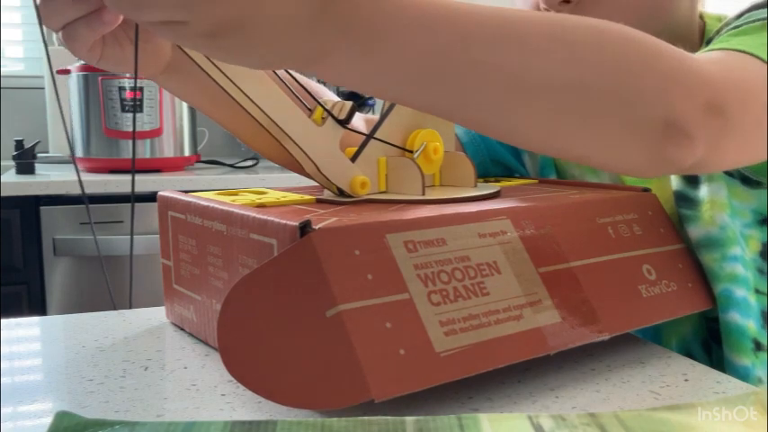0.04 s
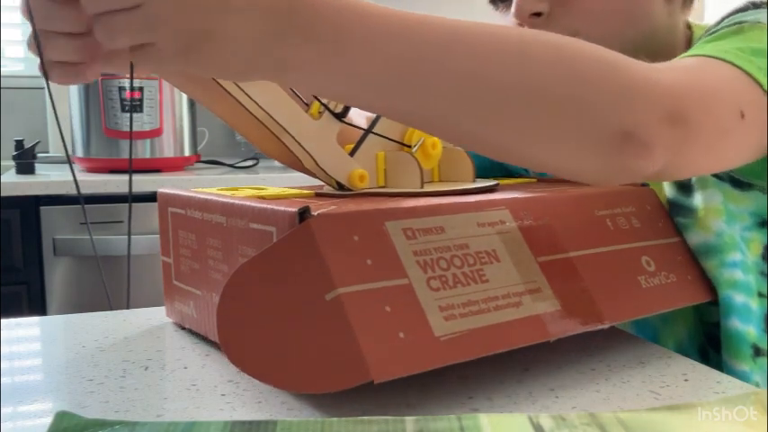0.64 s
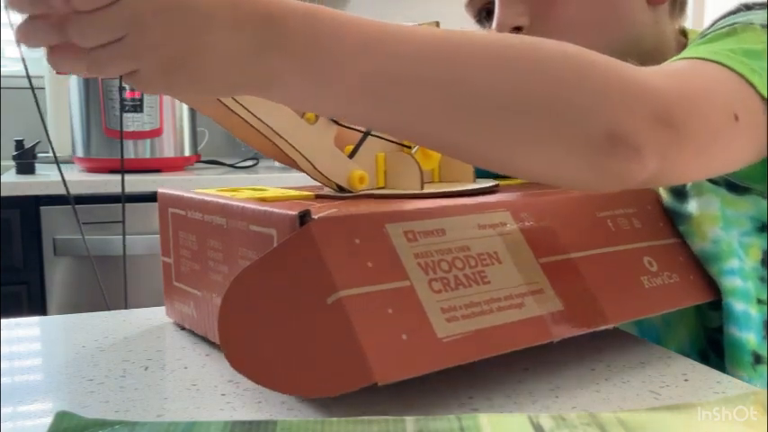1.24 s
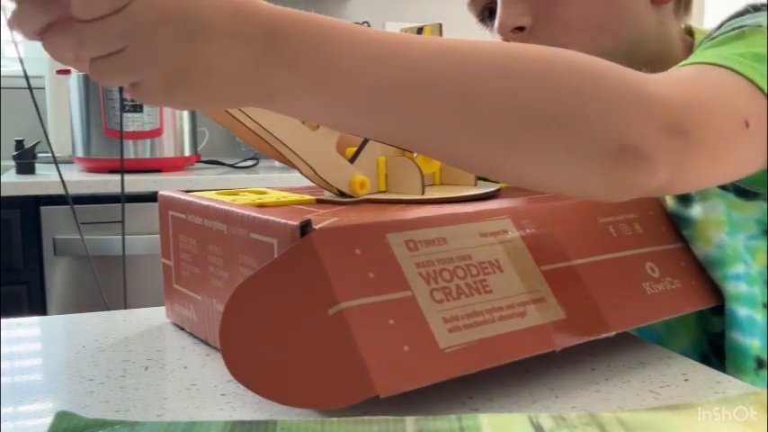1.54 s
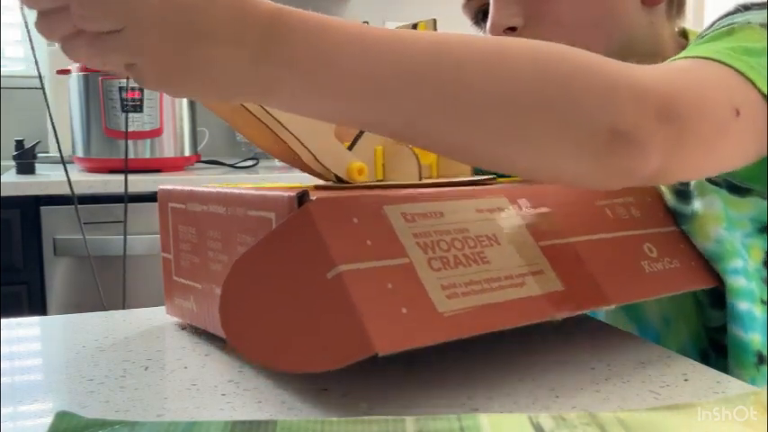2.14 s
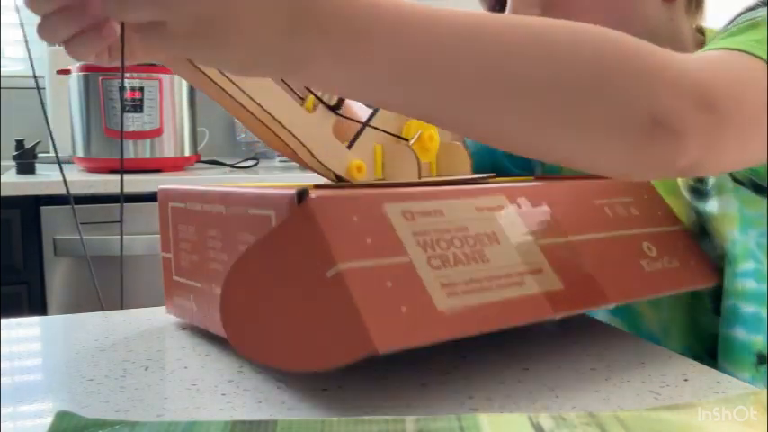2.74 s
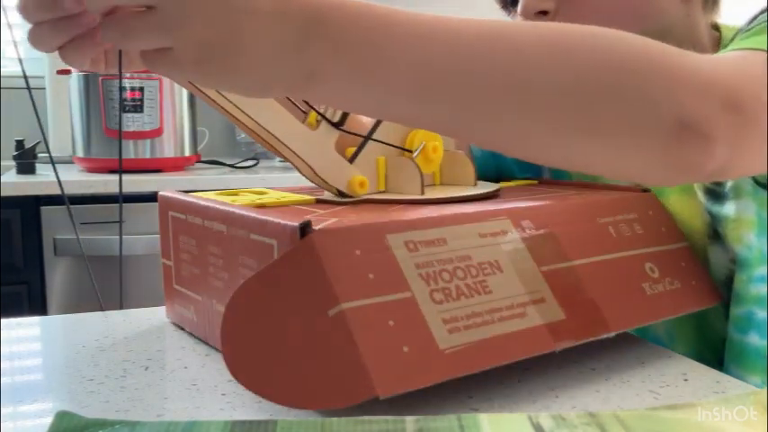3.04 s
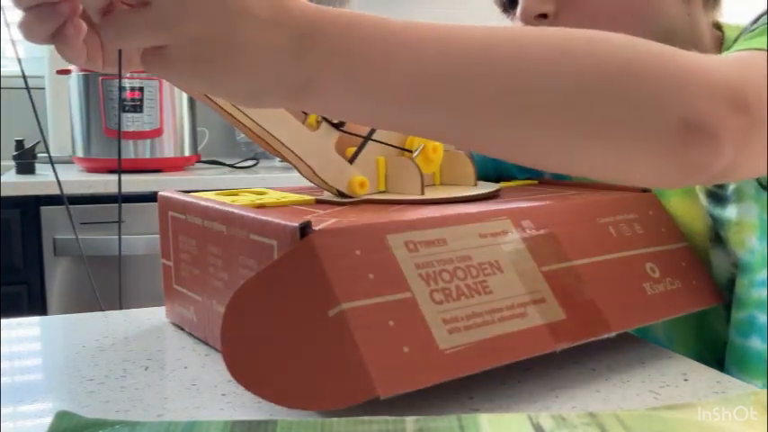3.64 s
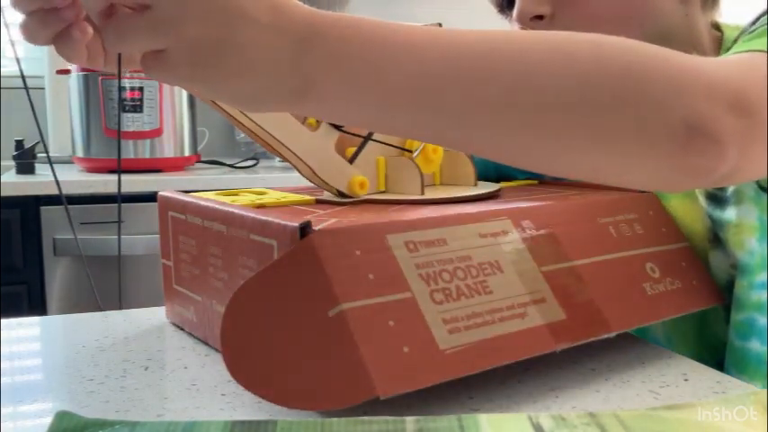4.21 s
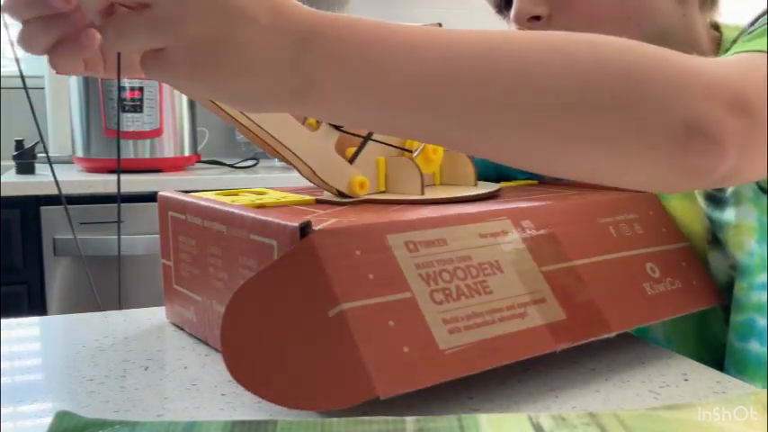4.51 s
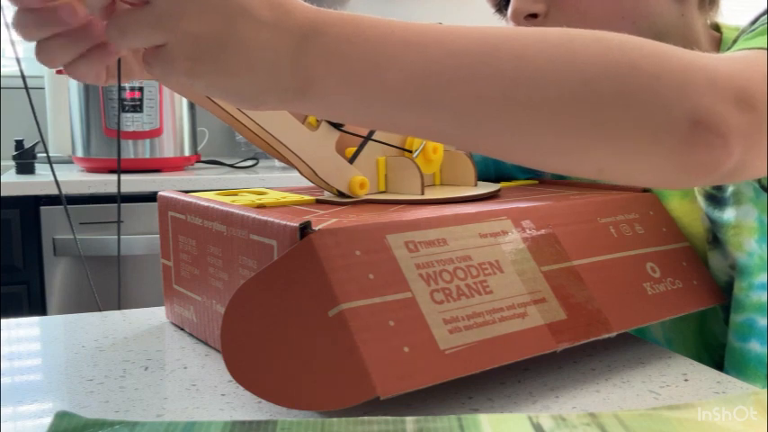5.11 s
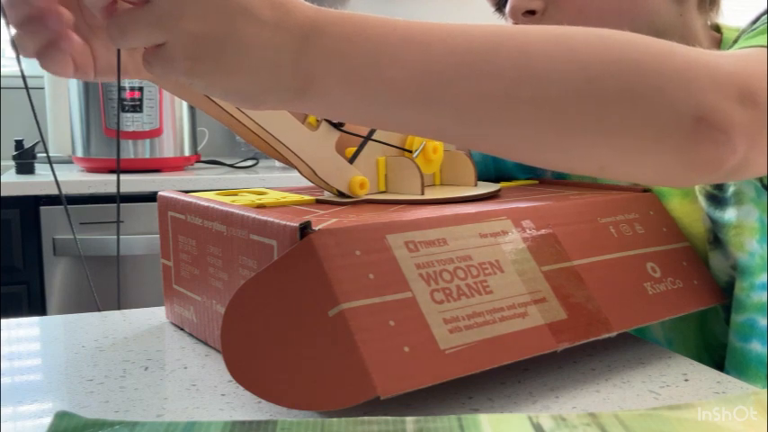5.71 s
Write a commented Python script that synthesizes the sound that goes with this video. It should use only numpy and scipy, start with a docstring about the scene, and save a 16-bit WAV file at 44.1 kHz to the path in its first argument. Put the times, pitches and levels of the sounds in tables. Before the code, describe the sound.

A wooden toy clicks and rubs on a hollow cardboard box in a quiet kitchen, and something rattles twice nearby.

```python
"""In a quiet kitchen, a child works the string of a wooden toy crane that stands on a cardboard box.
The joints slip, tick and creak, and the box answers each tick with a hollow knock. Parts rub, the
string swishes, fingers chafe, and the box slides as it tips up. Further off, something clatters twice
and fills the room. A low hum and a faint electronic whine lie over the room noise."""
import sys
import numpy as np
from scipy import signal
from scipy.fft import rfft, irfft
from scipy.io import wavfile
from scipy.ndimage import uniform_filter1d

SR = 44100
rng = np.random.default_rng(int(sys.argv[2]) if len(sys.argv) > 2 else 0)


def wav_record(signal):
    """Record a signal, one row per channel, as 16-bit PCM in the file named by sys.argv[1]."""
    frames = np.transpose(np.atleast_2d(signal))
    bounded = np.clip(frames, -1, 1)
    # unit amplitude maps onto the largest positive 16-bit level
    quanta = np.round(bounded * 32767).astype(np.int16)
    wavfile.write(sys.argv[1], SR, quanta)


N = 254016
TIME = np.arange(N) / SR

# strokes of the hand that rub the parts: start/s, length/s, relative grumble/dB, relative hiss/dB
PART_RUBS = [(-0.02, 0.19, -52.5, -71.5), (0.187, 0.15, -49, -57.5), (0.46, 0.12, -50, -72),
             (0.548, 0.2, -61.5, -61.5), (0.836, 0.21, -60, -69.5), (1.05, 0.07, -59, -62),
             (1.191, 0.058, -55, -87), (1.378, 0.099, -58, -79), (1.453, 0.088, -56, -63.5),
             (1.748, 0.2, -60, -85), (2.93, 0.17, -62.5, -71.5), (3.339, 0.18, -60, -74),
             (4.19, 0.28, -64.5, -90), (4.504, 0.15, -59, -78), (4.849, 0.11, -56, -82),
             (5.211, 0.094, -56, -67.5), (5.52, 0.085, -53, -73)]
# slides of the box as it tips up and settles back: same columns
BOX_SLIDES = [(2.044, 0.36, -51, -52.5), (2.486, 0.21, -61.5, -65), (2.699, 0.22, -62, -65)]


def gain_of(db):
    """Turns decibels into a factor to multiply by."""
    return 10 ** (np.asarray(db) / 20)


def unit_level(x):
    """Scales a sound to an average size (rms) of 1."""
    return x / np.sqrt(np.mean(x ** 2) + 1e-20)


def look_up(points, hz):
    """Reads between the rows of a (frequency, value) table, on a log frequency axis."""
    f, value = np.transpose(points)
    return np.interp(np.log(hz + 1), np.log(f), value)


def coloured(x, spectrum):
    """Filters a sound by a (f/Hz, level/dB) table; nothing rings ahead of a hit."""
    size = 4096
    log_gain = np.log(gain_of(look_up(spectrum, abs(np.fft.fftfreq(size, 1 / SR)))))
    response = np.fft.ifft(np.exp(np.conj(signal.hilbert(log_gain)))).real
    return signal.oaconvolve(x, response[:size // 2])[:len(x)]


def add(mix, s, sound):
    """Lays a sound into the mix at s seconds."""
    part = mix[max(round(s * SR), 0):][:len(sound)]
    part += sound[:len(part)]


def swell(s, half_s):
    """A bell-shaped rise and fall around s seconds."""
    return np.exp(-((TIME - s) / half_s) ** 2 / 2)


def grains(per_s, spread_db):
    """Tiny random hits of uneven size."""
    size = gain_of(spread_db * np.minimum(rng.exponential(1, N), 4))
    return size * rng.choice([-1., 1.], N) * (rng.random(N) < per_s / SR)


def band_noise(centre_hz, width):
    """Noise around one frequency; the width is a share of the centre."""
    hz = np.fft.rfftfreq(N, 1 / SR)
    bell = np.exp(-(np.log((hz + 1) / centre_hz) / width) ** 2)
    return unit_level(irfft(rfft(rng.standard_normal(N)) * bell, N))


def fuzzy_tone(hz, width_hz):
    """Noise so narrow that it sounds like an unsteady tone."""
    off_hz = np.fft.rfftfreq(N, 1 / SR) - hz
    return unit_level(irfft(rfft(rng.standard_normal(N)) / (1 + (2 * off_hz / width_hz) ** 2), N))


def room(x, build_s, fade_scale=1):
    """The kitchen's echo builds up quickly, and each band fades at its own speed."""
    # the echo's fade, before fade_scale: f/Hz, time to fall 60 dB/s
    fade_times = [(100, 1), (300, 0.54), (550, 0.4), (1000, 0.42), (3000, 0.42), (8000, 0.4),
                  (15000, 0.042)]
    size = SR // 2
    hz, t, bands = signal.stft(rng.standard_normal(size), SR, nperseg=256)
    fade = gain_of(-60 * t / (fade_scale * look_up(fade_times, hz)[:, None]))
    tail = signal.istft(bands * fade, SR, nperseg=256)[1][:size]
    tail *= 1 - np.exp(-(TIME[:size] / build_s) ** 2)
    return signal.fftconvolve(x, tail / np.linalg.norm(tail))[:N]


def background(air_db=-61.5, hum_hz=132, hum_db=-70, wander_hz=6, fuzz_db=2):
    """Room air, a wavering appliance hum and thin, fuzzy electronic whines."""
    # colour of the room air: f/Hz, relative level/dB
    air_colour = [(30, -31), (60, -1), (125, -2.5), (200, -14), (280, -19.5), (600, -26.5), (1200, -30.5),
                  (3000, -33.5), (6000, -36.5), (8300, -30.5), (9700, -39), (11500, -30.5), (15000, -19.5)]
    # electronic whines: f/Hz, level/dB
    whines = [(8958, -86), (11946, -79), (13308, -88), (13512, -86), (14901, -79)]
    out = gain_of(air_db) * unit_level(coloured(rng.standard_normal(N), air_colour))
    for hz, db in whines:
        wander = wander_hz * unit_level(uniform_filter1d(rng.standard_normal(N), size=2000))
        tone = unit_level(np.sin(2 * np.pi * np.cumsum(hz + wander) / SR))
        out += gain_of(db) * (tone + gain_of(fuzz_db) * fuzzy_tone(hz, width_hz=220))
    return out + gain_of(hum_db) * fuzzy_tone(hum_hz, width_hz=21)


def clatter(direct_db=-3, room_db=-1, thump_hz=132, thump_s=0.035, parts=6):
    """Hard parts rattle over a low thump; much of the rattle arrives as room echo."""
    # the two clatters: t/s, relative level/dB, rise/s, fade/s, thump level/dB
    hits = [(3.522, -30.7, 0.018, 0.034, -43), (3.758, -36.5, 0.015, 0.028, -43.5)]
    # colour of the rattle: f/Hz, relative level/dB
    rattle_colour = [(35, -53), (60, -14), (129, -17), (204, -8), (289, 2), (408, -6), (526, -1.5),
                     (1030, -14), (1100, -7), (1390, -15.5), (2060, -13), (5300, -22), (7500, -18.5),
                     (9670, -30), (15000, -35)]
    out = np.zeros(N)
    for _ in range(parts):
        rattle = unit_level(coloured(grains(per_s=600, spread_db=4.5), rattle_colour))
        shake = np.zeros(N)
        for s, db, rise_s, fade_s, _ in hits:
            age = np.maximum(TIME - s, 0)
            rise = np.minimum(age / rise_s, 1) ** 2
            fade = np.exp(-np.maximum(age - rise_s, 0) / fade_s)
            shake += gain_of(db) * rattle * rise * fade
        echo = gain_of(room_db) * room(shake, build_s=0.0013)
        out += (gain_of(direct_db) * shake + echo) / np.sqrt(parts)
    thump = band_noise(thump_hz, width=0.33)
    for s, *_, thump_db in hits:
        age = np.maximum(TIME - s, 0) / thump_s
        out += gain_of(thump_db) * thump * age * np.exp(1 - age)
    return out


def string_swishes():
    """The moving string swishes in one wide, bright band."""
    # swishes: t/s, level/dB, half length/s
    swishes = [(0.219, -51, 0.01), (0.683, -51.5, 0.0021), (1.936, -57.5, 0.012), (2.61, -66, 0.087),
               (2.85, -68, 0.1), (4.593, -52, 0.0088), (5.287, -53.5, 0.006), (5.605, -62, 0.04),
               (5.639, -54, 0.0043)]
    loudness = sum(gain_of(db) * swell(s, half_s) for s, db, half_s in swishes)
    return band_noise(centre_hz=9050, width=0.89) * loudness


def finger_chafes():
    """Fingers chafe on the wood, each time in a narrow band; the faint rows near 3.2 kHz at 2.8 and 3.1 s are
    the cardboard box rasping as it slides."""
    # touches and rasps: t/s, level/dB, f/Hz, half length/s
    chafes = [(0.094, -66, 6340, 0.033), (0.267, -40, 7050, 0.002), (0.335, -50.5, 915, 0.012),
              (1.222, -55, 920, 0.0092), (1.498, -67, 1080, 0.033), (1.605, -69.5, 3330, 0.01),
              (2.814, -75, 3240, 0.086), (3.096, -75.5, 3260, 0.028), (5.306, -55.5, 1760, 0.033),
              (5.611, -51, 1260, 0.003)]
    return sum(gain_of(db) * band_noise(hz, width=0.22) * swell(s, half_s)
               for s, db, hz, half_s in chafes)


def box_ring(size, detune=0.066, air_hz=255, damping=0.96):
    """The spectrum of the ringing box; each spot on it rings at slightly different pitches."""
    # tones of the plywood crane on its box: f/Hz, relative level/dB, time to fall 60 dB/s
    tones = [(147.6, 0.5, 0.14), (191, -3, 0.098), (310, 3, 0.071), (415, 6, 0.044), (552, 17.5, 0.013),
             (805, 2, 0.026), (1278, -2, 0.031), (1863, 1, 0.006), (2780, 3, 0.0054), (4350, 4, 0.0028),
             (7870, 14.5, 0.0017)]
    t, hz = TIME[:size], np.fft.rfftfreq(size, 1 / SR)
    ring = np.zeros(size)
    for f, db, fade_s in tones:
        pitch_hz = f * (1 + detune * rng.standard_normal())
        ring += gain_of(db - 60 * t / fade_s) * np.sin(2 * np.pi * pitch_hz * t)
    # a hollow box gives off little sound below the note of the air inside it
    ratio = 1j * hz / air_hz
    return rfft(ring) * ratio ** 2 / (ratio ** 2 + damping * ratio + 1)


def rubbing(strokes, surface, grumble_db, hiss_db, room_db, rise_s, fade_s, ease_db, arch_db):
    """Coarse slips make the box grumble and sometimes catch; the fine surface hisses and snags."""
    # colour of the grumble: f/Hz, relative level/dB
    grumble_colour = [(50, -22), (80, -21), (135, 12), (205, -2.5), (275, 11.5), (450, -8), (600, -1.5),
                      (900, -13), (1300, -41), (3000, -25)]
    catches = signal.oaconvolve(grains(per_s=45, spread_db=5.5), irfft(box_ring(size=8192)))[:N]
    slips = coloured(grains(per_s=700, spread_db=2.5), grumble_colour)
    coarse = unit_level(unit_level(slips) + gain_of(-7) * unit_level(catches))
    texture = unit_level(grains(per_s=7400, spread_db=1))
    snags = gain_of(-13) * unit_level(grains(per_s=14, spread_db=8))
    fine = unit_level(coloured(texture + snags, surface))
    out = np.zeros(N)
    for start, length, grumble, hiss in strokes:
        age = TIME - start
        contact = np.clip(age / rise_s, 0, 1) * np.exp(-np.maximum(age - length, 0) / fade_s)
        progress = np.clip(age / length, 0, 1)
        # the grumble eases as the stroke goes on
        out += contact * coarse * gain_of(grumble + grumble_db + ease_db * (1 - progress))
        # with arch_db above 0, the hiss peaks past midway, where the hand moves fastest
        out += contact * fine * gain_of(hiss + hiss_db - arch_db * (2 * (progress - 0.66)) ** 2)
    return out + gain_of(room_db) * room(out, build_s=0.00083)


def rubbing_parts():
    """The crane's parts rub with a quick start and an even hiss."""
    # colour of the wood's hiss: f/Hz, relative level/dB
    wood = [(400, -16.5), (900, 4.5), (1300, 0), (1900, -0.5), (2800, -5), (3500, -1.5), (4600, -11),
            (5800, -11.5), (7900, 1), (10000, -11.5), (12500, -0.5), (15500, -27)]
    return rubbing(PART_RUBS, wood, grumble_db=-5.5, hiss_db=-1.5, room_db=-8,
                   rise_s=0.018, fade_s=0.037, ease_db=7, arch_db=0)


def sliding_box():
    """The box slides with a hiss that swells and stops short."""
    # colour of the cardboard's hiss: f/Hz, relative level/dB
    cardboard = [(500, -26), (900, 5.5), (1300, 0.5), (1650, -3), (2100, 3), (2800, 1), (3150, 1.5),
                 (3500, 6.5), (3900, 0), (4600, -6), (5800, -9.5), (7900, -3.5), (10000, -8.5),
                 (15500, -0.5)]
    return rubbing(BOX_SLIDES, cardboard, grumble_db=-2, hiss_db=3.5, room_db=-14.5,
                   rise_s=0.07, fade_s=0.016, ease_db=2.5, arch_db=7)


def creaks(jitter=0.0843, soft_hz=2200, room_db=-12):
    """A tight joint sticks and slips in short, nearly regular runs that sing through the box; the two slow
    runs, at 0.278 and 1.127 s, sound as low thuds."""
    # runs of slips, and two low thuds played as slow runs: t/s, level/dB, slip rate/Hz, half length/s
    runs = [(0.27, -29.5, 780, 0.002), (0.278, -41.5, 145, 0.016), (0.687, -35.5, 940, 0.0027),
            (1.127, -42, 207, 0.0047), (4.594, -46, 540, 0.004), (5.291, -38, 530, 0.0066),
            (5.498, -49, 500, 0.0067), (5.605, -44, 550, 0.0088)]
    size = 8192
    t, hz = TIME[:size], np.fft.rfftfreq(size, 1 / SR)
    out = np.zeros(N)
    for s, db, per_s, half_s in runs:
        wobble = unit_level(uniform_filter1d(rng.standard_normal(size), size=100))
        slip_count = np.cumsum(per_s * (1 + jitter * wobble)) / SR
        slips = np.diff(np.floor(slip_count), prepend=0)
        voice = unit_level(irfft(rfft(slips) * box_ring(size) / (1 + 1j * hz / soft_hz)))
        bell = np.exp(-((t - t.mean()) / half_s) ** 2 / 2)
        add(out, s - t.mean(), gain_of(db) * voice * bell)
    return out + gain_of(room_db) * room(out, build_s=0.0017, fade_scale=0.7)


def knock(levels_db, grit, drag_s=0.0019, travel_s=0.001946, soft_hz=2500, rough_hz=1300):
    """One slip rings the box; the treble travels faster through it, so the knock chirps downwards."""
    # centres of the thud, knock, click and tick bands: f/Hz
    bands = [340, 780, 2400, 7500]
    size = 8192
    t, hz = TIME[:size], np.fft.rfftfreq(size, 1 / SR)
    # a soft push makes the bass; the surfaces grate as they let go, which makes the treble
    grating = rfft(grit * rng.standard_normal(size) * np.sqrt(t / drag_s) * np.exp(-t / drag_s))
    blow = 1 / (1 + hz / soft_hz) + grating * hz ** 2 / (hz ** 2 + rough_hz ** 2)
    chirp = np.exp(-4j * np.pi * travel_s * np.sqrt(500 * hz))
    # a faint, dull echo off the counter, about 7 ms later
    echo = 0.066 * np.exp(-2j * np.pi * hz * 0.00727) / (1 + (hz / 1200) ** 2)
    spectrum = box_ring(size) * blow * chirp * (1 + echo)
    # where and how hard the joint is struck sets each band's level (energy spread over 10 ms)
    shares = [look_up(np.c_[bands, row], hz) for row in np.eye(len(bands))]
    energy = np.array([np.sum(irfft(spectrum * share) ** 2) for share in shares])
    energy_db = 10 * np.log10(energy / (SR / 100))
    return coloured(irfft(spectrum), np.c_[bands, levels_db - energy_db])


def faint_slips(per_s=7, scatter_db=2.5):
    """Small chance slips during each rub and slide, as more rows for crane_joints."""
    rows = []
    for start, length, grumble_db, _ in PART_RUBS + BOX_SLIDES:
        count = int(per_s * length + rng.random())
        for s in start + length * rng.random(count):
            weight, hardness = scatter_db * rng.standard_normal(2)
            rows.append((s, grumble_db - 3.5, weight - 2, hardness - 9))
    return rows


def crane_joints(thud_db=-2, knock_db=-3, click_db=-13, tick_db=-25.5, loud_db=-35):
    """The joints slip: weight feeds the thud, hardness the click, and both feed the tick."""
    # clear slips: t/s, strength/dB, weight behind it/dB, hardness of the contact/dB
    slips = [(0.0128, -58.5, 13.5, 0.5), (0.178, -47.5, 3.5, 6), (0.217, -42, 2.5, 6), (0.2239, -41, 1, 3),
             (0.2636, -48, 13, 10), (0.2659, -33.5, -8, -17), (0.3456, -45.5, -3, 6),
             (0.4756, -48, -1.5, -9), (0.5624, -46, -1, -4), (0.5862, -43.5, 1, 4), (0.6849, -39.5, -9, -5),
             (0.691, -42, 2.5, 9.5), (0.697, -41.5, 1, -12), (0.7237, -43.5, 6.5, 4),
             (0.7509, -54, 12, 8.5), (0.7848, -45.5, 4, -0.5), (0.9006, -43.5, 7.5, 7.5),
             (1.062, -41.5, 5, 8), (1.1054, -47.5, -14, -3), (1.1168, -53.5, 12.5, 0),
             (1.4601, -48, -4, 9.5), (1.4704, -39, -11.5, -18), (1.699, -63, 12, -12),
             (1.7545, -60.5, 5.5, -13), (1.869, -49, -7, -0.5), (1.9445, -58.5, 11.5, -2),
             (1.9961, -48.5, 8, 2), (2.1157, -47, 3.5, 1), (2.459, -51.5, -2, -20), (2.477, -60, 10.5, 4),
             (2.535, -57, 0, 15.5), (2.625, -57.5, -8, 4), (2.7727, -51.5, -25, -12),
             (2.8525, -52, -16, -12), (2.9471, -42.5, 4, 1), (2.982, -40, 3.5, -1.5),
             (3.185, -53, -33, -3.5), (3.356, -41, 4.5, 9), (4.2934, -49.5, -15, -8.5),
             (4.4506, -54.5, -7, -1), (4.589, -47.5, -5, 2.5), (4.8934, -55, 3, -8),
             (4.9102, -55.5, 5, -13), (5.019, -49.5, -6, 1), (5.179, -51.5, -16, -13),
             (5.2577, -47.5, -3, -5), (5.2846, -40, -11, 4), (5.489, -52.5, 6, -4), (5.6032, -50.5, 6, -2)]
    out = np.zeros(N)
    for s, db, weight, hardness in slips + faint_slips():
        tick = tick_db + hardness + 0.62 * weight
        levels_db = db + np.array([thud_db + weight, knock_db, click_db + hardness, tick])
        add(out, s, knock(levels_db, grit=0.46))
        # the room gathers sound from all sides, which evens out the grating
        smooth = knock(levels_db, grit=0)
        # lighter slips lie further along the crane's arm, so more of their sound is echo
        room_db = -10 + 0.26 * (loud_db - levels_db.max())
        add(out, s, gain_of(room_db) * room(smooth, build_s=0.0018, fade_scale=0.59))
    return out


def scene():
    """All the sounds together in one channel."""
    toy = crane_joints() + creaks() + rubbing_parts() + sliding_box()
    handling = string_swishes() + finger_chafes()
    return (toy + handling + clatter() + background())[None]


def record(dry, low_hz=55, high_hz=15800):
    """Cuts away the deep bass and the highest treble."""
    thinned = signal.sosfilt(signal.butter(4, low_hz, "high", fs=SR, output="sos"), dry)
    treble_cut = signal.firwin(511, high_hz, window=("kaiser", 9), fs=SR)
    return signal.oaconvolve(thinned, treble_cut[None], "same")


dry = scene()
out = record(dry)
wav_record(out)
```